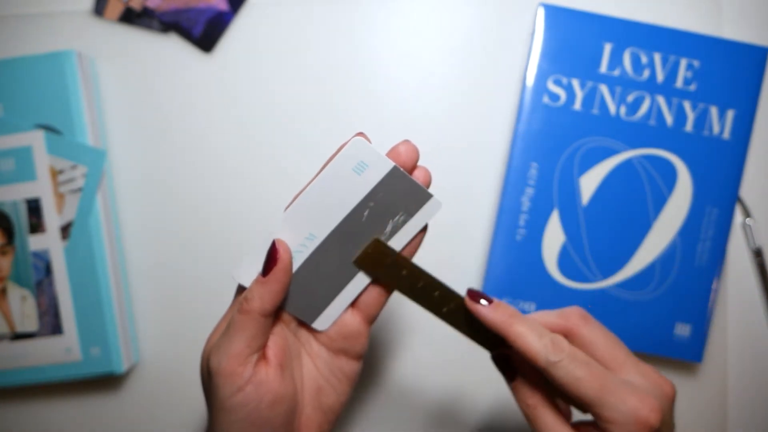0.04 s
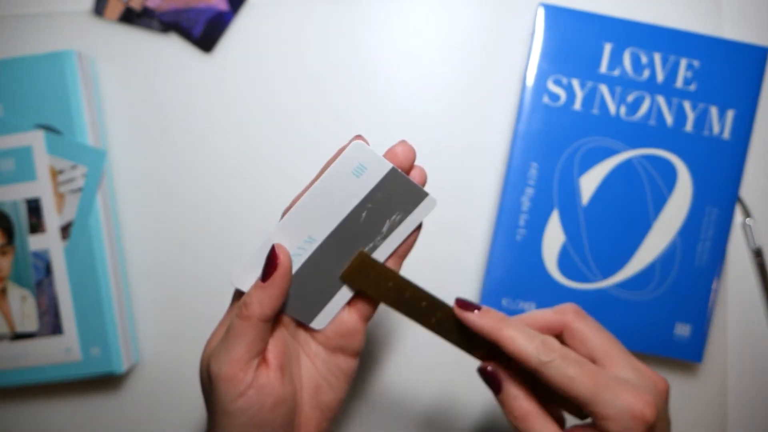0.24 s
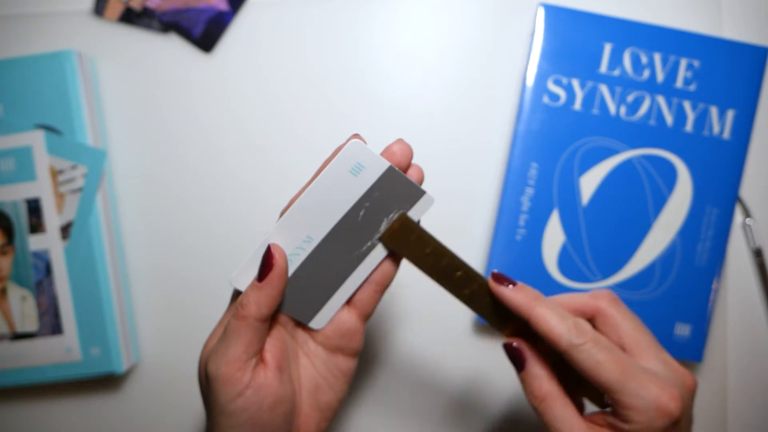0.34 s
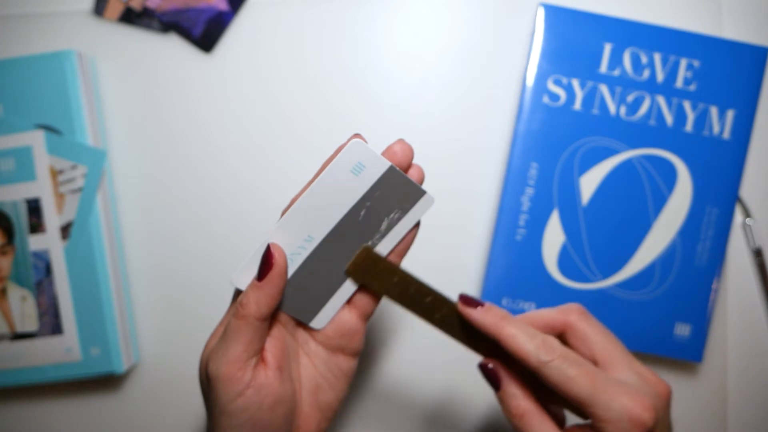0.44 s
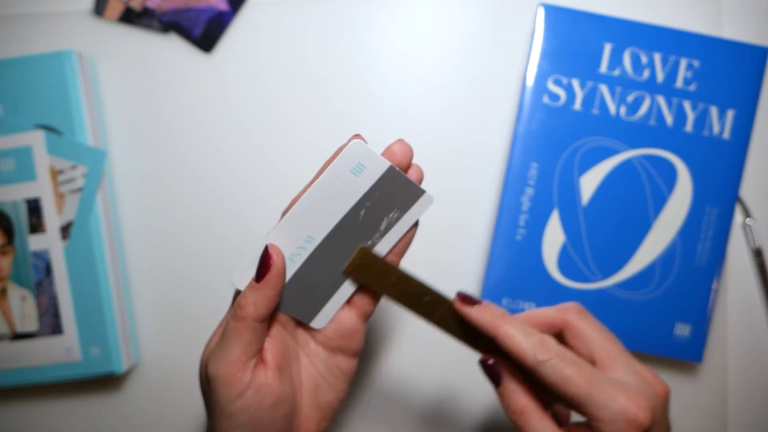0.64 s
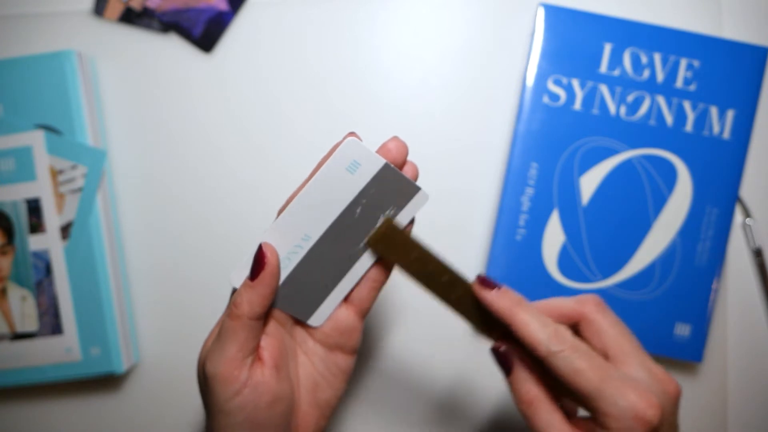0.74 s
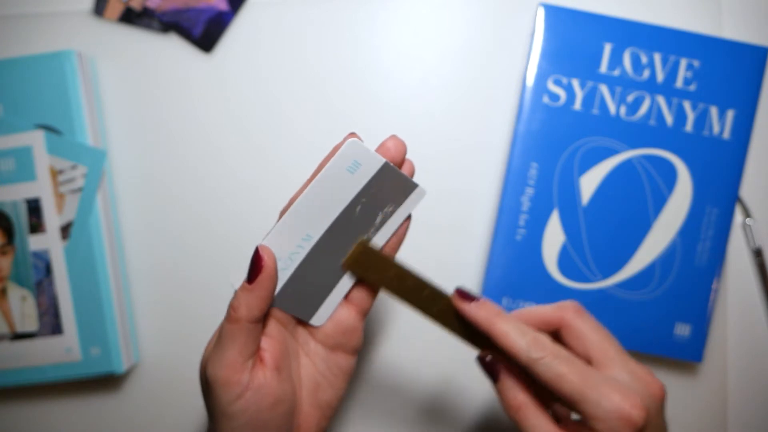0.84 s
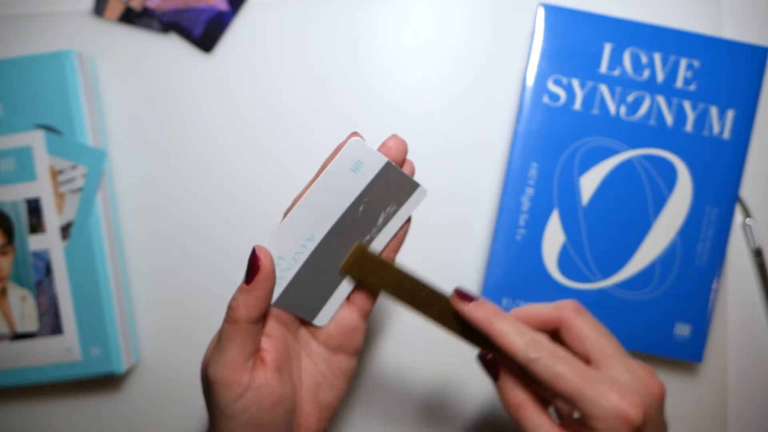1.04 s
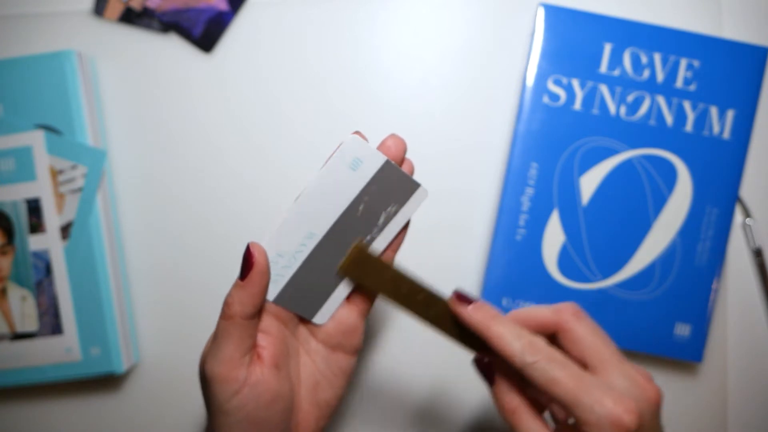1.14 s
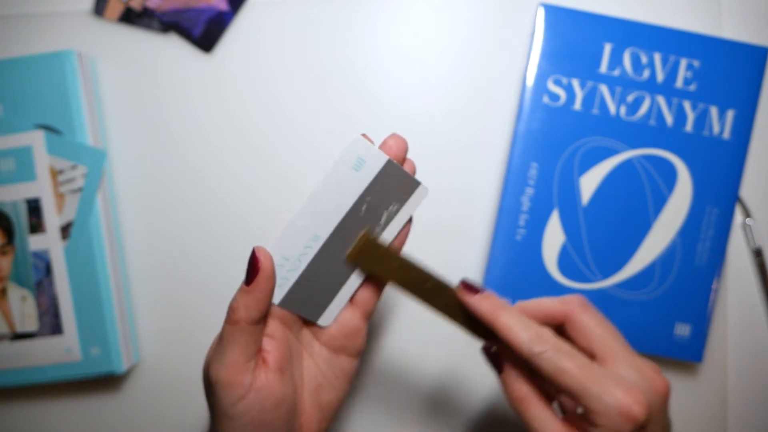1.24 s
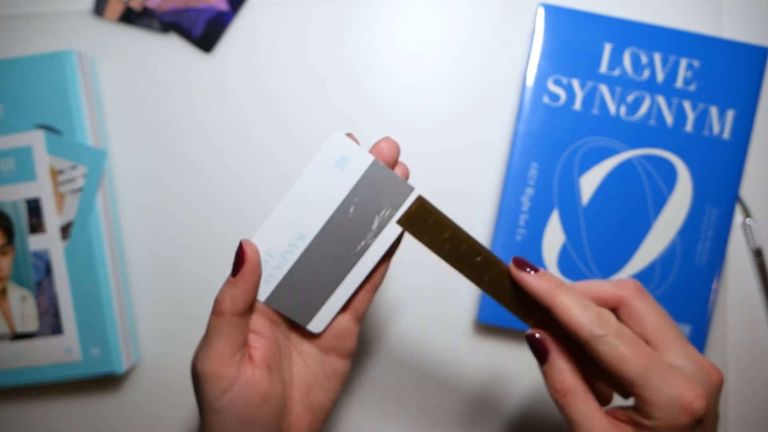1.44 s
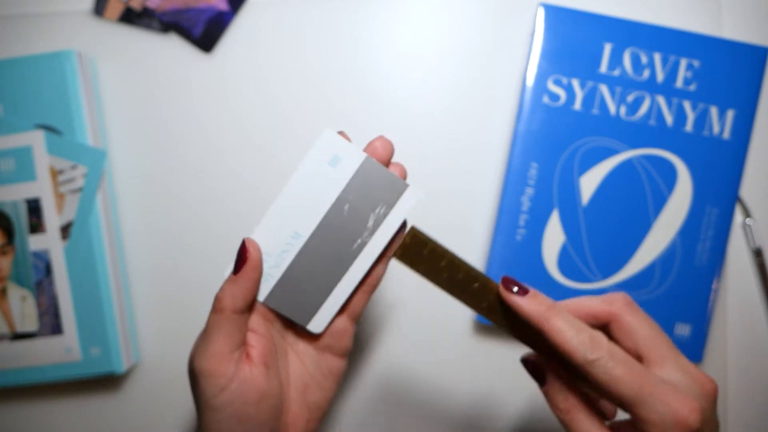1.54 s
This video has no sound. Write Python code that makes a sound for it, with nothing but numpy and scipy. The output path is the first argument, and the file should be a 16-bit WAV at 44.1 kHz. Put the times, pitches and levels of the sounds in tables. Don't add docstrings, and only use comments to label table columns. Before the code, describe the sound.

A metal ruler edge scrapes coating off a plastic card in quick, bright, raspy strokes

```python
import sys
import numpy as np
from scipy import signal
from scipy.fft import rfft, irfft, next_fast_len
from scipy.io import wavfile
from scipy.ndimage import uniform_filter1d, map_coordinates

SR = 44100
rng = np.random.default_rng(int(sys.argv[2]) if len(sys.argv) > 2 else 0)


def dump(signal):
    limited = np.clip(np.atleast_2d(signal).T, -1, 1)
    pcm = np.round(limited * 32767).astype(np.int16)
    wavfile.write(sys.argv[1], SR, pcm)


def magnitude_from_level(level_db):
    exponent = np.asarray(level_db, float) / 20
    return 10 ** exponent


N = 70560

# (pitch_hz, level_db)
FIZZ = [(1900, -33), (2250, -25), (2600, -8), (3150, -15.5), (4600, -7.5), (8400, -2.2), (9400, -8),
        (10300, -20)]
# (pitch_hz, level_db)
SHEEN = [(9300, -39), (10300, -5.5), (11700, -0.8), (15300, -11), (15900, -21.5)]


def unit(x):
    return x / np.sqrt(np.mean(x ** 2) + 1e-20)


def along(points, hz):
    point_hz, value = np.transpose(points)
    return np.interp(np.log(hz + 1), np.log(point_hz + 1), value)


def wobble(rate):
    knots = rng.standard_normal(N // 16)
    return unit(map_coordinates(knots, [np.arange(N) * rate / SR]))


def filtered(x, response):
    size = next_fast_len(N + 8192)
    spectrum = rfft(x, size) * response(np.fft.rfftfreq(size, 1 / SR))
    return irfft(spectrum, size)[..., :N]


def modes(rows, cut_hz):
    def response(f):
        ring = 0
        for k, (centre, width, db) in enumerate(rows):
            resonance = 1j * f * width / (centre * centre - f * f + 1j * f * width)
            ring = ring + (-1) ** k * magnitude_from_level(db) * resonance
        s = 1j * f / cut_hz
        high_pass = s * s / (s * s + 0.56 * s + 1)
        return (ring * high_pass) ** 2
    return response


def colour(points):
    return lambda f: magnitude_from_level(along(points, f)) * (f >= points[0][0] / 2)


def flakes():
    flakes_per_s, size_spread_db, smooth_share, clump_db = 6500, 6, 0.65, 1
    chance = rng.random(N)
    size = np.minimum(rng.exponential(size=N), 4)
    direction, rub = rng.standard_normal((2, N))
    grains = (chance < flakes_per_s / SR) * np.sign(direction) * magnitude_from_level(size_spread_db * size)
    mix = smooth_share * rub + (1 - smooth_share) * unit(grains)
    return unit(mix * magnitude_from_level(clump_db * wobble(260)))


def patchy(x, depth_db):
    z = signal.stft(x, nperseg=256)[2]
    field = uniform_filter1d(rng.standard_normal(z.shape), size=5, axis=0)
    field = uniform_filter1d(field, size=6, axis=1)
    return signal.istft(z * magnitude_from_level(depth_db * unit(field)), nperseg=256)[1][:N]


def hand_strokes():
    # (start_s, full_speed_s, slowing_s, stop_s, level_db)
    timing = [(-.005, 0.036, 0.076, 0.12, -40), (0.116, 0.14, 0.15, 0.21, -39.5),
              (.203, 0.279, 0.2978, 0.306, -25.5), (0.314, 0.333, 0.36, 0.39, -30),
              (0.336, .37, .38, 0.47, -48.5), (0.425, 0.494, 0.5, 0.528, -32),
              (0.529, 0.558, 0.59, 0.627, -30), (0.632, 0.645, 0.71, .72, -40),
              (.6965, .701, 0.7, 0.736, -28), (.736, 0.77, 0.79, 0.8435, -29),
              (0.837, 0.907, 0.915, 0.954, -31.5), (0.948, 0.973, 0.99, 1.0564, -27),
              (1.049, 1.119, 1.112, 1.174, -29), (1.155, 1.198, 1.2187, 1.265, -27.5),
              (1.258, 1.277, 1.322, 1.362, -29), (1.357, 1.366, 1.382, 1.402, -45.5)]
    rise_power, fall_power = 1.33, 3.7
    t = np.arange(N) / SR
    start, full, slowing, stop, db = np.transpose(timing)[..., None]
    speeding = np.clip((t - start) / np.maximum(full - start, 1e-3), 0, 1)
    braking = np.clip((stop - t) / np.maximum(stop - slowing, 1e-3), 0, 1)
    rise = np.sin(np.pi / 2 * speeding) ** rise_power
    fall = np.sin(np.pi / 2 * braking) ** fall_power
    return magnitude_from_level(db) * rise * fall, np.clip((t - start) / (stop - start), 0, 1)


def edge_catches():
    # (start_s, level_db)
    catches = [(.0295, -54), (.036, -54), (0.078, -33), (0.137, -29.5), (.243, -31), (0.279, -20),
               (0.285, -32), (0.298, -33), (0.322, -27), (.352, -22.5), (.448, -33), (0.489, -30.5),
               (0.698, -24.5), (.761, -21.5), (0.77, -26), (0.917, -30.5), (0.961, -27.5), (0.981, -21),
               (0.9889, -19), (1.174, -29), (1.279, -36.5), (1.3673, -42), (1.374, -38.5)]
    t60_s, rise_s = .022, 0.00056
    t = np.arange(N) / SR
    snaps = np.zeros(N)
    for start, db in catches:
        decay = magnitude_from_level(db - 60 * np.maximum(t - start, 0) / t60_s)
        snaps += decay * np.clip((t - start) / rise_s, 0, 1)
    return snaps


def scraping():
    # (place at start, place at stop, fizz_db, flex_db, flex lateness 0-1)
    contact = [(0.079, 0.21, -3.5, 0.5, 0.7), (0.28, -0.082, -1, -6.5, 0), (.25, 0.08, 0, -7, 0.37),
               (.04, 0.28, -0.5, -7, .65), (0.24, 0.41, 1.7, 3, 0.4), (0.11, .04, 1.5, -5, 0.56),
               (-0.05, 0.43, 0.8, 5.5, 0.78), (0.19, 0.42, 2, 6.5, 0.3), (-.3, 0.2, 1, -3.5, .55),
               (0.38, -0.73, 0.5, -3.5, .65), (0.037, -.25, 1.1, 0.5, 0.53), (0.073, -0.3, -3, 1, 0.63),
               (-0.097, -0.3, 1.75, 2, 0.74), (-0.16, 1.12, 0.7, -9.5, 0.41), (0.35, 0.99, 1.3, -4.5, 0.89),
               (1, 0.71, -1, -3, .65)]
    # (pitch_hz, width_hz, level_db)
    middle = [(3463, 346, -1.5), (3820, 618, 0), (4433, 910, -4)]
    grip = [(3550, 410, -4.5), (4090, 600, 0), (4840, 1000, 0)]
    rim = [(2890, 610, -0.5), (3474, 740, -1), (4490, 920, -1), (5360, 440, -2)]
    # (pitch_hz, width_hz, level_db)
    flex = [(1646, 370, 18.8), (1970, 400, -7.5)]
    ring_db, fizz_level_db, sheen_db, flex_level_db = -2.5, -5.5, -15.5, -26.5
    low_cut_hz, rim_cut_hz, flex_cut_hz = 3150, 2570, 1600
    flex_span = 0.33
    drag_db, patch_db = 0.53, 3

    gains, done = hand_strokes()
    start, stop, fizz_db, flex_db, late = np.transpose(contact)[..., None]
    place = np.clip(start + (stop - start) * done, -1, 1)
    power = np.sum(gains ** 2, axis=0) + 1e-12
    force = np.sqrt(power * magnitude_from_level(2 * drag_db * wobble(44.62)) + edge_catches() ** 2)

    rub, other = flakes(), flakes()
    fizz = patchy(0.62 * rub + 0.79 * other, patch_db)
    bright = (np.sqrt(power) / magnitude_from_level(-27.5)) ** .3
    bend = magnitude_from_level(flex_db) * np.exp(-((done - late) / flex_span) ** 2)
    layers = [(1 - abs(place), modes(middle, low_cut_hz), ring_db, rub),
              (np.maximum(-place, 0), modes(grip, low_cut_hz), ring_db, rub),
              (np.maximum(place, 0), modes(rim, rim_cut_hz), ring_db, rub),
              (magnitude_from_level(fizz_db), colour(FIZZ + [(11500, -45)]), fizz_level_db, fizz),
              (magnitude_from_level(fizz_db) * bright, colour(SHEEN), sheen_db, fizz),
              (bend, modes(flex, flex_cut_hz), flex_level_db, other)]
    out = np.zeros(N)
    for share, response, db, source in layers:
        scale = np.sqrt(np.mean(filtered(source, response) ** 2))
        mix = np.sum(gains ** 2 * share, axis=0) / power
        out += magnitude_from_level(db) / scale * filtered(source * force * mix, response)
    return out


def spread(x):
    # (pitch_hz, level_db)
    side_level = [(1500, -27.5), (3000, -38.5), (5000, -19.5), (9000, -18.5), (14000, -16.5)]
    z = signal.stft(x, nperseg=128)[2]
    scrambled = z * np.exp(2j * np.pi * rng.random(z.shape))
    side = signal.istft(scrambled, nperseg=128)[1][:N]
    side = side * np.std(x) / np.std(side)
    side = filtered(side, lambda f: magnitude_from_level(along(side_level, f)))
    return np.array([x + side, x - side])


def room(x):
    # (pitch_hz, t60_s)
    decay = [(1500, 0.23), (4000, 0.11), (12000, 0.21)]
    gap_s = .003
    hz, t, z = signal.stft(rng.standard_normal((2, SR // 3)), SR, nperseg=256)
    fading = z * magnitude_from_level(-60 * t / along(decay, hz)[:, None])
    tail = signal.istft(fading, SR, nperseg=256)[1]
    tail = np.pad(tail / np.linalg.norm(tail[0]), ((0, 0), (int(gap_s * SR), 0)))
    tail = np.array([tail[0] + 0.17 * tail[1], tail[0] - 0.21 * tail[1]])
    return signal.fftconvolve(x[None], tail, axes=1)[:, :N]


def background():
    # (pitch_hz, level_db per Hz)
    rumble_points = [(15, -46), (25, -5), (232, -2), (371, -8), (415, -13), (482, -12), (663, -13.5),
                     (879, -14.5), (2200, -37), (2860, -70.5), (4840, -120)]
    # (pitch_hz, level_db)
    hiss_points = [(1000, 5.7), (5000, -6), (11500, -6), (12500, -25.5)]
    # (multiple, level_db rms)
    whine = [(2., -85), (3., -91), (4., -88), (5., -98), (6., -96), (7., -96), (8., -99), (10., -97),
             (12., -101)]
    rumble_db, hiss_db, side_db = -60, -79.5, -21
    whine_hz, whine_db = 1000, 1.7

    closed = list(rumble_points) + [(2 * rumble_points[-1][0], -80)]
    noise = rng.standard_normal((2, 2, N))
    rumble = unit(filtered(noise[0], lambda f: magnitude_from_level(along(closed, f)) * (f > 18)))
    hiss = unit(filtered(noise[1], colour(hiss_points)))
    mid, side = magnitude_from_level(rumble_db) * rumble + magnitude_from_level(hiss_db) * hiss
    t = np.arange(N) / SR
    for multiple, db in whine:
        phase = 2 * np.pi * (multiple * whine_hz * t + rng.random())
        mid = mid + np.sqrt(2) * magnitude_from_level(db + whine_db) * np.sin(phase)
    return np.array([mid + magnitude_from_level(side_db) * side, mid - magnitude_from_level(side_db) * side])


def nudge():
    centre_s, width_s, pitch_hz, level_db = .036, 0.0085, 600, -58
    t = np.arange(N) / SR - centre_s
    return magnitude_from_level(level_db) * np.exp(-(t / width_s) ** 2) * np.sin(2 * np.pi * pitch_hz * t)


def slip():
    # (pitch_hz, width_hz, level_db)
    rim_ring = [(1676, 500, -12.5), (2610, 615, -1), (3320, 1100, 0), (4770, 1800, -5)]
    centre_s, width_s, level_db, crack_db = 1.3805, 0.0027, -32, -10
    burst = rng.standard_normal((2, N))
    shape = np.exp(-((np.arange(N) / SR - centre_s) / width_s) ** 2)
    ring = unit(filtered(burst[0], modes(rim_ring, 1100)))
    crack = unit(filtered(burst[1], colour(FIZZ + SHEEN[2:])))
    return magnitude_from_level(level_db) * shape * (ring + magnitude_from_level(crack_db) * crack)


def scene():
    card = scraping() + nudge() + slip()
    mix = spread(card) + magnitude_from_level(-10) * room(card) + background()
    return mix * magnitude_from_level([[-.1], [.1]])


def low_pass(x):
    return signal.sosfilt(signal.butter(12, 15750, fs=SR, output="sos"), x)


def record(dry):
    mix = filtered(dry, lambda hz: hz < 15750)
    return low_pass(mix)


dry = scene()
out = record(dry)
dump(out)
```